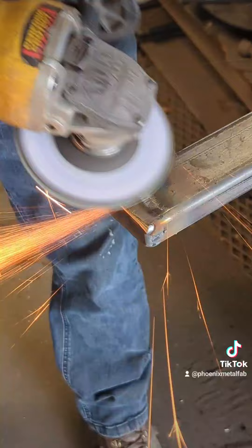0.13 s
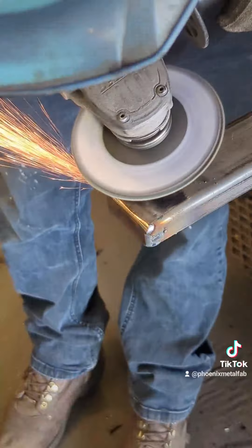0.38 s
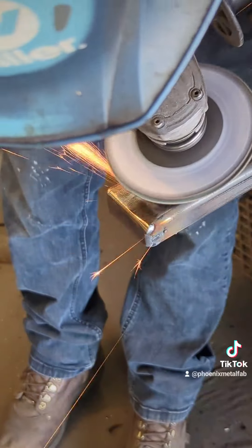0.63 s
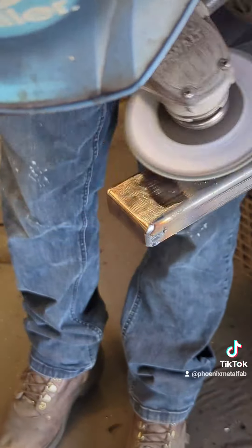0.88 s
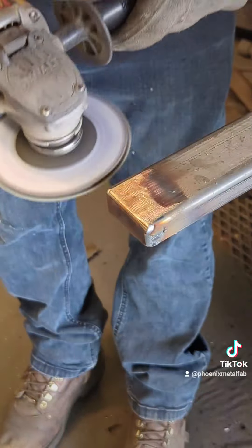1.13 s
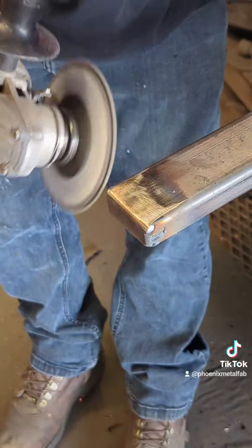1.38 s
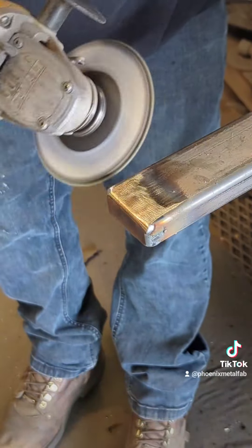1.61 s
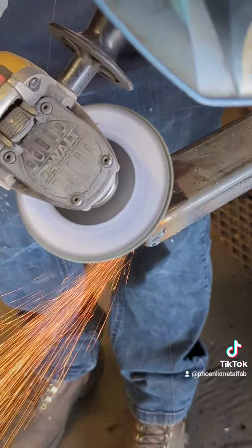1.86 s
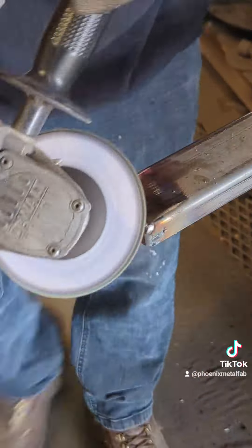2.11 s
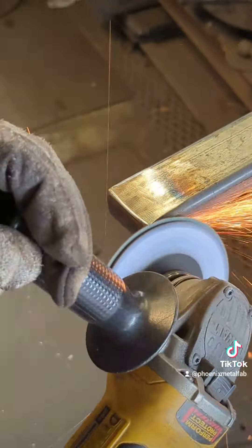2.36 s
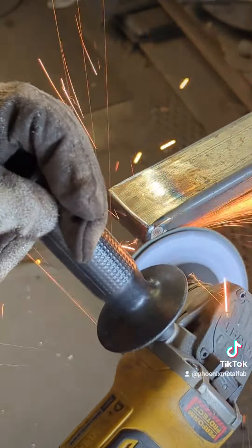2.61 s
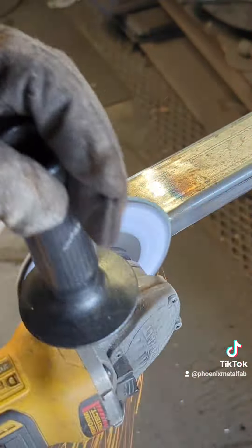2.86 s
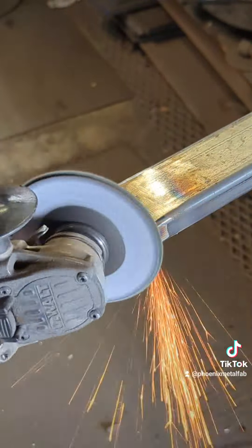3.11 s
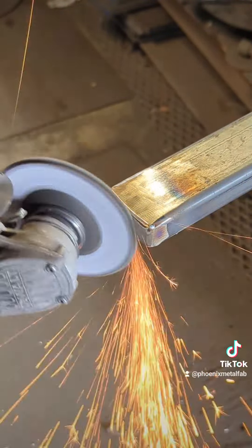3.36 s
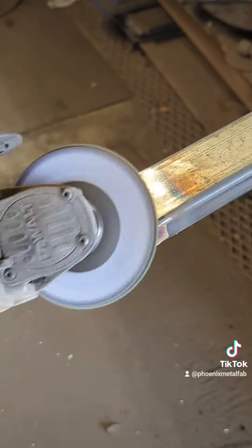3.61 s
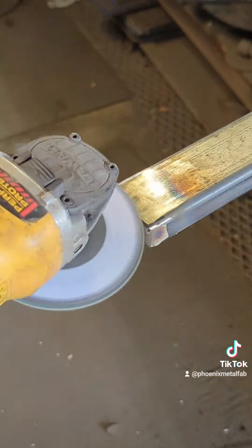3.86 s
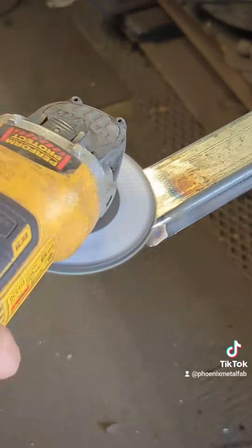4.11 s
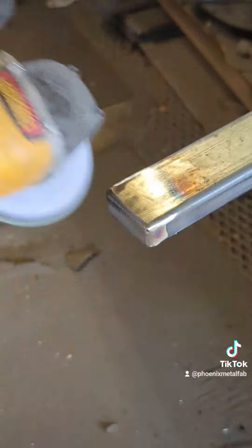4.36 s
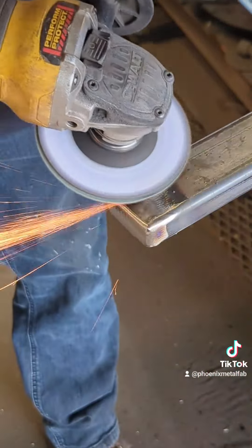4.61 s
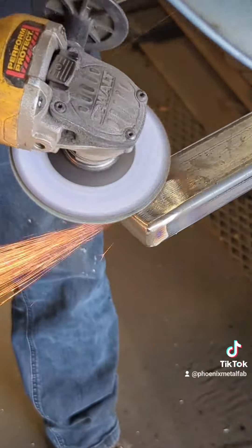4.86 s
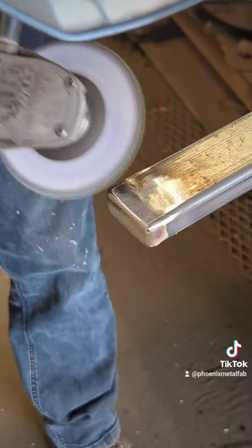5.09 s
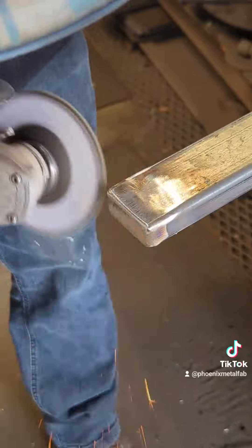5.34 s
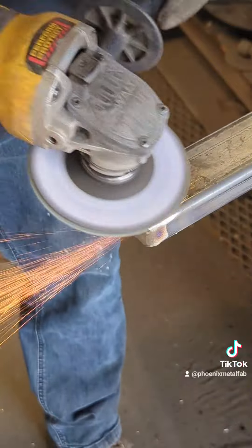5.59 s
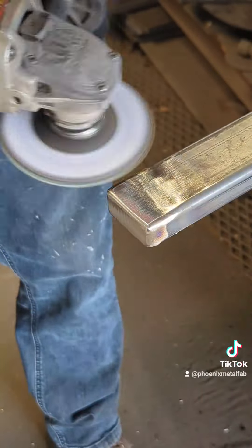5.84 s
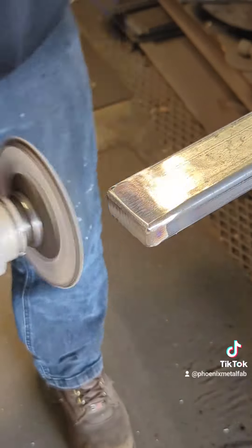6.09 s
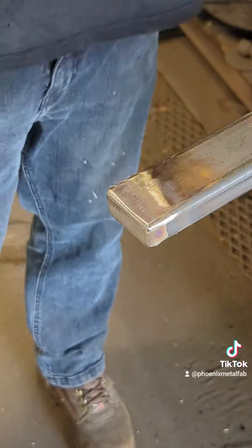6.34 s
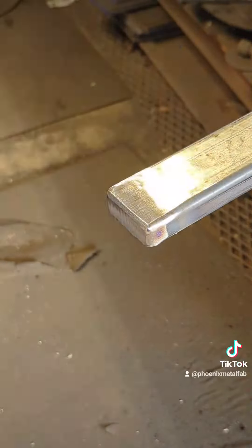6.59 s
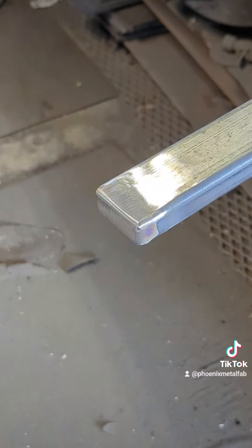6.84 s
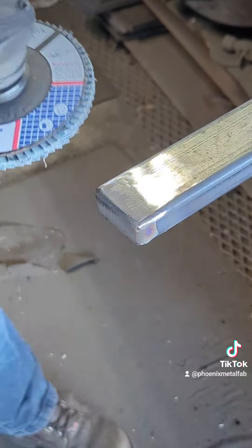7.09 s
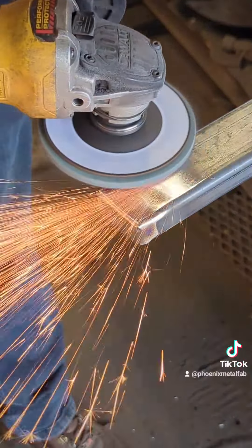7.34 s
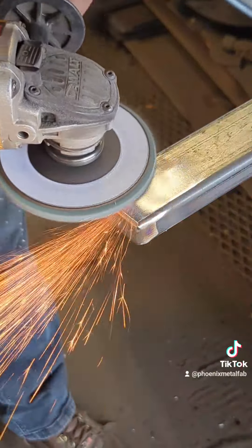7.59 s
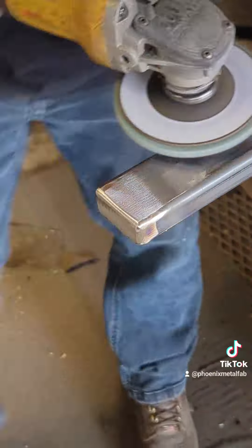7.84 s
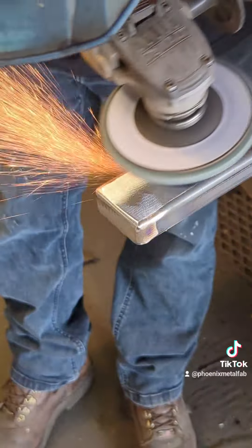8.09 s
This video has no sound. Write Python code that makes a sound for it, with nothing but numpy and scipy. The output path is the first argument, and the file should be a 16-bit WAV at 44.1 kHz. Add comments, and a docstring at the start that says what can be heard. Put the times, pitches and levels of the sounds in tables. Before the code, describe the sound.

Bright, flickering grinding of steel over a high motor whine, flaring with each stroke, pausing about a second in a rumbling workshop before resuming.

```python
"""An angle grinder works a weld on a steel tube: bright flickering hiss, motor whine and fuzzy disc orders, flaring
with each stroke over knocks, ringing taps and short rough tones. At 2.4 s the disc is pressed hard and its orders
swell. At 6 s it coasts down, leaving workshop rumble and air hiss, which drop out for an instant near 6.87 s; at
7.2 s it spins up and grinds on. Hiss, rumble and air are shaped random spectra, whine and orders are sines that
share a motor speed, jabs and bites dragging disc tones below it; knocks and taps are decaying modes."""
import sys
import numpy as np
from scipy import signal
from scipy.io import wavfile
from scipy.ndimage import uniform_filter1d

SR = 44100
rng = np.random.default_rng(int(sys.argv[2]) if len(sys.argv) > 2 else 0)


def attenuation_scalar(level_db):
    """Turn a level in dB into a linear amplitude multiplier (20 dB per decade)."""
    decades = np.asarray(level_db, float) / 20
    return 10 ** decades


def log_audio(samples):
    """Write samples as a 16-bit WAV file to the path given in sys.argv[1]."""
    # one column per channel
    frames = np.atleast_2d(samples).T
    # limit to full scale, then quantise
    limited = np.clip(frames, -1, 1)
    pcm = np.round(limited * 32767).astype(np.int16)
    wavfile.write(sys.argv[1], SR, pcm)


N = 362061

# Spells in which the disc grinds. Each row: start in seconds, end in seconds.
SPELLS = [(0, 6.16), (7.166, 9)]
# The disc is pressed hard: start in seconds, end in seconds.
HEAVY = (2.385, 2.75)
# The sound drops out: start in seconds, end in seconds.
DROPOUT = (6.872, 6.879)
SWITCH_OFF_S, SILENT_S = 6.025, 6.08
SWITCH_ON_S, SPIN_UP_S = 7.194, 0.018
FREE_HZ = 4402  # motor whine at full speed


def evened(x):
    """Scales to rms 1."""
    return x / np.sqrt(np.mean(x ** 2) + 1e-20)


def read(points, hz):
    """Reads a spectrum on a log-frequency axis."""
    f, value = np.transpose(points)
    return np.interp(np.log(hz + 1), np.log(f + 1), value)


def running(spans, t):
    """1 inside the spans, 0 outside, with short edges."""
    return sum(np.clip(np.minimum(t - a, b - t) / 0.00093 + 1, 0, 1) for a, b in spans)


def flicker(per_s):
    """Random wander of rms about 1 that changes per_s times a second."""
    steps = rng.standard_normal(int(N / SR * per_s) + 2)
    return np.interp(np.arange(N) / SR * per_s, np.arange(len(steps)), steps) * np.sqrt(1.5)


def noise(colour_db, patchy_db, size, count=7):
    """Two-port noise of rms 1: random short-time spectra coloured by colour_db(t, hz), with drifting patches."""
    # Likeness of the two ports. Each row: frequency in Hz, coherence.
    coherence = [(200, 0.9), (330, 0.99), (1000, 1), (2500, 0.91), (5000, 0.77), (9000, 0.67), (15000, 0.5)]
    # Phase between the ports. Each row: frequency in Hz, lead of the left port in radians.
    port_lead = [(3000, 0.081), (6000, 0.25), (10000, 1), (15000, 0.74)]
    hop = size // 4
    hz, t = np.fft.rfftfreq(size, 1 / SR), np.arange(N // hop + 5) * hop / SR
    a, b, c, d, patches = rng.standard_normal((5, len(t), len(hz)))
    patches = uniform_filter1d(patches, size=7, axis=0)
    patches = evened(uniform_filter1d(patches, size=count, axis=1))  # count bins wide
    same = np.clip(read(coherence, hz), -1, 1)
    left = a + 1j * b
    right = same * left + np.sqrt(1 - same ** 2) * (c + 1j * d)
    right = right * np.exp(-1j * read(port_lead, hz))
    z = np.array([left, right]) * attenuation_scalar(colour_db(t[:, None], hz) + patchy_db * patches)
    return evened(signal.istft(z.transpose(0, 2, 1), nperseg=size, noverlap=size - hop)[1][:, :N])


def light(db, count):
    """Light events scattered at random before switch-off, within 3 dB of the given level."""
    u = rng.random((count, 2))
    return [(a * SWITCH_OFF_S, db + 3 * (2 * b - 1)) for a, b in u]


def sided(events, lead):
    """Lets each event lead in the left or the right port by chance; lead in radians."""
    return [(s, db, lead * side) for (s, db), side in zip(events, rng.choice([-1, 1], len(events)))]


def low_floor():
    """Faint low noise that sinks while the tool rests."""
    def colour_db(t, hz):
        return read([(20, -3.0), (300, 1.0), (500, -21), (900, -90)], hz)
    t = np.arange(N) / SR
    level_db = -71.5 + 2.9 * (running(SPELLS, t) - 1)
    return attenuation_scalar(level_db) * noise(colour_db, patchy_db=0.8, size=2048)


def rumble():
    """Lumpy low noise of machines booming in the hall: broad colour plus two resonances."""
    # Base level before flicker and a common offset. Each row: time in seconds, level in dB.
    shop_levels = [(0, -46.5), (1.6, -45.5), (1.8, -51), (2.9, -49.5), (3.9, -53.5), (4.76, -48),
                   (5.5, -53), (6.3, -44), (7.1, -43.5), (7.65, -55), (8.21, -46)]
    # Broad colour. Each row: frequency in Hz, density in dB per Hz.
    rumble_colour = [(150, -70), (250, -37), (457, -5), (655, -3.5), (826, -10), (1130, -12.5),
                     (1250, -12.5), (1490, -12), (2460, -30), (4000, -63), (5200, -64), (8800, -120)]
    # Resonances. Each row: frequency in Hz, width in Hz, boost in dB.
    booms = [(477, 18, 3), (696.7, 18, 8)]

    def colour_db(t, hz):
        boost_db = sum(db / (1 + ((hz - f) / w) ** 2) for f, w, db in booms)
        return read(rumble_colour, hz) + boost_db
    t = np.arange(N) / SR
    level_db = np.interp(t, *np.transpose(shop_levels)) + 2.5 + 1.46 * flicker(70)
    return noise(colour_db, patchy_db=2.5, size=2048, count=2) * attenuation_scalar(level_db)


def air_hiss():
    """Smooth workshop air noise; after the dropout it comes back lower and rises to a new level."""
    # Colour of the air. Each row: frequency in Hz, density in dB per Hz.
    air_colour = [(1470, -21), (2500, -12.5), (3120, -13), (4090, -11.5), (4660, -12.5), (9100, -4.5),
                  (15700, -13.5)]
    before_db, after_db, dip_db, recover_s = -43.5, -39.5, -10, 0.3
    t = np.arange(N) / SR
    dip = np.clip(1 - (t - DROPOUT[1]) / recover_s, 0, 1)
    level_db = np.where(t < DROPOUT[1], before_db, after_db + dip_db * dip)
    return noise(lambda t, hz: read(air_colour, hz), patchy_db=0.9, size=512) * attenuation_scalar(level_db)


def struck(events, modes, rise_s, detune):
    """Every blow sums the same decaying modes, detuned at random, with a phase lead in one port."""
    t, out = np.arange(SR // 8) / SR, np.zeros((2, N + SR))
    for (s, db, lead), tune in zip(events, rng.standard_normal(len(events))):
        ahead = lead / 2 * np.array([[1], [-1]])
        blow = 0
        for hz, mode_db, t60 in modes:
            decay = attenuation_scalar(mode_db - 60 * t / t60)
            blow = blow + decay * np.sin(2 * np.pi * hz * (1 + detune * tune) * t + ahead)
        blow *= 1 - np.exp(-t / rise_s)
        out[:, round(s * SR):][:, :len(t)] += attenuation_scalar(db) * blow / abs(blow).max()
    return out[:, :N]


def knocks():
    """Dull knocks: heavily damped modes, with light ones scattered at random."""
    # Knocks. Each row: start in seconds, peak in dB, lead of the left port in radians.
    knock_events = [(2.3264, -28, -2.5), (2.3921, -29, -1.5), (2.4234, -32, 2), (2.474, -37, 2),
                    (2.5077, -27.5, 0.8), (2.5177, -29, 1.5), (2.546, -31, 1.5), (2.8248, -29.5, -0.6),
                    (3.0174, -30, -1.1), (3.3412, -28, 1.5), (3.5292, -30.5, 1), (3.6591, -30.5, 0.5),
                    (3.7227, -35, -1.5), (3.865, -29, 0.5), (4.1121, -31.5, 1), (4.6789, -28.5, 0.5),
                    (4.715, -28, -0.8), (5.0971, -26.5, -1), (5.1211, -32, -1.5), (5.1767, -28, 1),
                    (5.2235, -27, 1.4), (5.2895, -29, 1), (5.3837, -32, -1.5), (5.4266, -29, 0.2),
                    (5.7252, -28, 1.5), (5.7497, -26.5, -1.5), (7.17, -24, -0.5), (7.3032, -13.5, -1.2),
                    (7.3205, -32, 1), (7.3391, -21, -1.8), (7.5242, -13.5, 1), (7.757, -27.5, -2),
                    (7.8985, -20, 1.5), (8.0059, -27.5, 0.5), (8.0398, -30, 0.5), (8.058, -24, -0.3),
                    (8.0797, -30, 1.5), (8.1631, -23.5, 0.7), (8.1784, -20, -1.5)]
    # Modes. Each row: frequency in Hz, level in dB, t60 in seconds.
    thud_modes = [(704, -1, 0.012), (1237, 6, 0.0064), (2110, -7, 0.0088), (3275, 3, 0.0046)]
    events = knock_events + sided(light(-39, count=16), lead=0.72)
    return struck(events, thud_modes, rise_s=0.0034, detune=0.11)


def taps():
    """The disc taps the tube and its wall rings in lightly damped modes."""
    # Taps. Each row: start in seconds, peak in dB.
    tap_events = [(1.007, -26), (1.0552, -26), (1.1058, -25), (1.1527, -24.5), (1.204, -27), (1.383, -32),
                  (1.439, -36), (1.531, -32), (3.5973, -29.5), (3.8492, -34), (4.1838, -32.5), (5.364, -29),
                  (5.4935, -23.5), (5.917, -29)]
    # Modes of the tube wall. Each row: frequency in Hz, level in dB, t60 in seconds.
    wall_modes = [(1357, -1, 0.051), (1285, -8.5, 0.061), (2270, -12, 0.038), (690, 5, 0.0094),
                  (1640, 1.5, 0.01)]
    return struck(sided(tap_events, lead=0.33), wall_modes, rise_s=0.001, detune=0.0058)


def short_tones():
    """Short gliding tones, rough in level and phase; those near 2450 Hz are the second disc order standing out."""
    # Each row: start in seconds, length in seconds, start frequency in Hz, end frequency in Hz, base level in dB.
    tone_events = [(0.462, 0.22, 1660, 1760, -46.5), (0.47, 0.257, 1055, 1114, -46),
                   (1.52, 0.19, 1156, 1090, -49.5), (2.299, 0.057, 2440, 2460, -45),
                   (2.8, 0.34, 917, 937, -51.5), (2.899, 0.1, 2430, 2470, -39),
                   (4.878, 0.19, 1064, 1110, -48), (6.12, 0.31, 1064, 1050, -52)]
    out = np.zeros((2, N))
    for s, length, hz, end_hz, db in tone_events:
        glide_hz = np.linspace(hz, end_hz, round(length * SR))
        n = len(glide_hz)
        rough = attenuation_scalar(db + 4.0 * flicker(110)[:n]) * signal.windows.tukey(n, 0.9)
        phase = 2 * np.pi * np.cumsum(glide_hz) / SR + flicker(47.5)[:n]
        out[:, round(s * SR):][:, :n] += rough * np.sin(phase)
    return out


def grip(t):
    """Hiss, whine, first-order and high-order base dB: each grip holds its levels and slides into the next."""
    # Each new grip turns the tool to or from the microphone. Each row: start in seconds, hiss level in dB,
    # whine level in dB, first disc order level in dB, reference level of the higher orders in dB.
    grips = [(0, -29, -40, -44.5, -35.5), (.075, -31.5, -44, -47, -46), (.125, -30, -43, -49.5, -39),
             (.19, -30.5, -42, -55, -54), (.31, -28.5, -39.5, -49.5, -38.5), (.9, -28.5, -43, -59, -64),
             (1.4, -28.5, -43.5, -55.5, -47), (1.782, -31, -44, -56, -44), (2.26, -30.5, -57, -62, -42.5),
             (2.55, -27.5, -55, -71, -62), (2.76, -30, -52, -56.5, -47), (3.5, -29.5, -48.5, -53, -47),
             (4.47, -29.5, -38.5, -64, -45.5), (4.6, -29.5, -39, -47, -38), (5.04, -30, -47, -51, -44.5),
             (5.32, -30.5, -46.5, -56.5, -46), (5.6, -30, -41.5, -55, -43), (6.04, -33.5, -48, -76, -49),
             (7.181, -28.5, -43, -53.5, -44.5), (7.3, -28.5, -42.5, -46, -47),
             (7.42, -29.5, -42.5, -50.5, -44.5), (7.55, -31, -44, -55.5, -47.5),
             (7.78, -28.5, -40, -48, -54), (7.92, -32, -46, -50, -44)]
    regrip_s = 0.05
    s, *values = np.transpose(grips)
    slides = [np.clip((t - at) / regrip_s + 0.5, 0, 1) for at in s[1:]]
    return [v[0] + sum(change * slide for change, slide in zip(np.diff(v), slides)) for v in values]


def scuff_db(t):
    """The disc scuffs the edge: one short jump of hiss and whine level for each scuff."""
    # Each row: time in seconds, jump in dB.
    scuffs = [(3.9, 8), (3.968, 8.5), (4.137, 7), (4.151, 7), (4.219, 9), (4.238, 5), (4.248, 10),
              (4.401, 5.5), (4.434, 3.5), (4.439, 8), (5.313, 7), (5.388, 7)]
    scuff_s = 0.0016
    out, half = np.zeros(len(t)), SR // 100
    bump = np.exp(-(np.arange(-half, half) / SR / scuff_s) ** 2)
    for s, db in scuffs:
        out[round(s * SR) - half:][:2 * half] += db * bump
    return out


def bites():
    """Pressure of each stroke, swelling and letting go within milliseconds, and the speed it costs the disc."""
    # Strokes that bite. Each row: time in seconds, drive in dB.
    stroke_events = [(0.41, -20), (0.4474, -18), (0.7944, -14), (0.997, -13.5), (1.032, -19), (1.048, -12),
                     (1.097, -10.5), (1.131, -18), (1.145, -14.5), (1.192, -12), (1.253, -16),
                     (1.7568, -14), (2.178, -12.5), (2.955, -20), (3.16, -12), (3.2257, -12), (3.279, -13),
                     (3.342, -14), (3.4, -12.5), (3.455, -20), (3.605, -16), (3.644, -17), (4.7202, -12),
                     (5.907, -15), (6.0204, -17), (7.174, -23), (7.195, -21)]
    flare, sag, u = np.zeros(N), np.zeros(N), np.arange(SR // 25) / SR
    swell = np.exp(-((u - 0.014) / np.where(u < 0.014, 0.009, 0.0065)) ** 2)
    for s, db in stroke_events + light(-17, count=14):
        at = round((s - 0.008) * SR)
        flare[at:][:len(u)] += attenuation_scalar(db) * swell
        sag[at:][:len(u)] = 0.081 * np.clip((u - 0.008) / 0.022, 0, 1)  # fraction of speed
    return flare, sag


def strokes(flare):
    """Noise part of each bite, in the bands where disc and tube sing."""
    # Singing bands. Each row: frequency in Hz, width in Hz, level in dB.
    bite_bands = [(12640, 400, 17.5), (9400, 86, -7), (13800, 700, -3), (7000, 2800, -11),
                  (4640, 1100, -26)]

    def colour_db(t, hz):
        return 20 * np.log10(sum(attenuation_scalar(db) / (1 + ((hz - f) / w) ** 2) for f, w, db in bite_bands))
    return noise(colour_db, patchy_db=3.0, size=256) * flare * attenuation_scalar(-18)


def grind():
    """Grit on steel: dense hiss whose lower part follows how the tool is turned, flickering with the grain."""
    # Hiss colours, before and after the pause. Each row: frequency in Hz, density in dB per Hz.
    hiss_colours = [
        [(530, -33), (900, -15.5), (1240, -12.5), (1520, -19), (2640, -17), (4260, -10), (5290, -11.5),
         (11900, -0.5), (15700, -7.5)],
        [(530, -46), (900, -11.5), (1240, -11), (1980, -17), (2490, -21), (2870, -13), (4260, -11),
         (8950, -1.5), (15700, -6)],
    ]
    # The disc rattles lightly along the edge: start in seconds, end in seconds.
    loose = (2.7, 4.45)

    def colour_db(t, hz):
        held = np.where(t > SPELLS[1][0], read(hiss_colours[1], hz), read(hiss_colours[0], hz))
        lower = np.clip(np.log(7000 / (hz + 1)) / 1.39, 0, 1)  # fades in below 7 kHz
        lower_db = 0.33 * (grip(t)[0] + 25.2) - 2.2  # swings more than the top
        lower_db = lower_db - 4.9 * running([HEAVY], t)
        lower_db = lower_db - 5 * running([(SILENT_S, SPELLS[0][1])], t)
        return held + lower * lower_db
    t = np.arange(N) / SR
    level_db = grip(t)[0] + 0.5 * flicker(30) + 0.46 * flicker(120) + 1.37 * flicker(240) + 1.87
    level_db += scuff_db(t) + 0.88 * running([loose], t) * flicker(170)
    level_db -= 3.3 * running([HEAVY], t)  # under load the power goes into the orders
    return noise(colour_db, patchy_db=2.0, size=512, count=5) * attenuation_scalar(level_db) * running(SPELLS, t)


def speed(t):
    """Whine frequency in Hz: load sags it, it coasts down when switched off and spins up again."""
    load_s, unload_s, load_sag_hz = 0.03, 0.025, 500
    deeper_hz, deepest_s, coast_hz_per_s = 180, 2.58, 28200
    pressed = np.minimum((t - HEAVY[0]) / load_s + 1, (HEAVY[1] - t) / unload_s + 1)
    pressed = np.clip(pressed, 0, 1)
    deeper = np.interp(t, [HEAVY[0], deepest_s, HEAVY[1]], [0, deeper_hz, deeper_hz / 3])
    hz = FREE_HZ - (load_sag_hz + deeper) * pressed
    coasting = np.maximum(hz - coast_hz_per_s * np.maximum(t - SWITCH_OFF_S, 0), 0)
    return np.where(t < SWITCH_ON_S, coasting, hz * np.tanh((t - SWITCH_ON_S) / SPIN_UP_S))


def jab(t):
    """One short jab at 0.064 s: rises to 1, holds and lets go."""
    return np.clip(1.8 * (1 - abs(t - 0.064) / 0.034), 0, 1)


def presses_db(t):
    """The disc leans in and its high orders swell."""
    # Each row: time in seconds, swell in dB.
    presses, press_s = [(0.135, 12.6), (0.165, 9.7)], 0.0078
    return sum(db * np.exp(-((t - s) / press_s) ** 2) for s, db in presses)


def motor_lines(t, gear, whine_db, first_db, high_db):
    """Lists each tone: ratio to the whine, dB, dB under heavy load, fuzz, disc multiple, half port lead."""
    # Orders of the disc shaft. Each row: multiple, dB against the high-order reference before the pause,
    # the same after it, dB under heavy load.
    disc_orders = [(1.5, -45, -12.5, -74), (2, -16.5, -8, -46), (2.5, -26, -5.5, -61), (3, -10, -6, -52),
                   (4, -27, -25, -66), (5, -10.5, -2, -49.5), (6, -25, -7, -44.5), (7, -8.5, 1, -43),
                   (8, -4, -12, -44), (9, -4.5, -12, -37), (10, 5.5, -1, -36.5), (11, -11, 3, -34.5),
                   (12, -6, -1, -34), (13, -21, -20, -37), (14, -30, -30, -35)]
    # Whine shifted by whole disc orders. Each row: multiple added, dB against the high-order reference,
    # dB under heavy load.
    sidebands = [(1, -30, -50), (2, -12, -50), (3, -16, -50), (4, -11, -56), (6, -8, -50), (7, -30, -37),
                 (11, -30, -35)]
    lines = [(1, whine_db, -41, 0.3, 0, 0.5), (gear, first_db, -54, 0.5, 1, 0.05)]
    lines.append((1270 / 4402, first_db - 4.5, -70, 1.3, 1, 0.05))  # beats with the first order
    for k, before_db, after_db, loaded_db in disc_orders:
        reference_db = np.minimum(high_db, -41 if k < 4 else 0)
        db = reference_db + np.where(t > SWITCH_ON_S, after_db, before_db)
        lines.append((k * gear, db, loaded_db, 0.62 if k < 4 else 0.8, k, 0.15))
    for k, db, loaded_db in sidebands:
        lines.append((1 + k * gear, high_db + db, loaded_db, 0.7, k, 0.15))
    return lines


def motor(flare, sag):
    """Whine, disc orders and sidebands on a shared speed; a jab or bite drags disc tones below it."""
    gear = 1238 / 4402  # first disc order against the whine
    jab_duck_db, jab_sag_hz, chirp_db = -8.5, 360, -17.5
    t = np.arange(N) / SR
    hz = speed(t)
    whine_db, first_db, high_db = grip(t)[1:]
    starting = (t > SWITCH_ON_S) * (1 - hz / FREE_HZ)  # the whine leads the start, the disc orders come in late
    whine_db = whine_db + 9 * starting + scuff_db(t) + jab_duck_db * jab(t)
    first_db = first_db + jab_duck_db * jab(t)
    high_db = high_db - 60 * starting + 1.3 * flicker(14) + presses_db(t)

    turns = 2 * np.pi * np.cumsum(hz) / SR
    braked = 2 * np.pi * np.cumsum(hz * (1 - sag)) / SR
    dragged = 2 * np.pi * np.cumsum(jab_sag_hz * jab(t)) / SR
    runout = 0.19 * flicker(45) + 0.23 * flicker(140)  # the disc runs a little ahead and behind, radians
    loaded = running([HEAVY], t)
    chatter = np.sin(2 * np.pi * np.cumsum(44 + 4 * flicker(12)) / SR)  # the pressed disc skips on the weld
    swell_db = 2.0 * chatter + 5 * (t - HEAVY[1]) / (HEAVY[1] - HEAVY[0])
    turns += 1.2 * loaded * chatter

    out = np.zeros((2, N))
    for ratio, db, loaded_db, fuzz, k, lead in motor_lines(t, gear, whine_db, first_db, high_db):
        ports = np.array([[lead], [-lead]])
        wander = fuzz * flicker(30 * ratio + 15) + k * gear * runout
        wander = wander + 1.1 * loaded * flicker(70 * ratio)
        rough_db = (3.0 - 1.5 * loaded) * fuzz * flicker(25 * ratio + 15)
        size = attenuation_scalar(db + loaded * (loaded_db + swell_db - db) + rough_db) * np.sqrt(2)
        if k > 6:  # a bite drives the high orders as a falling chirp
            chirp = np.cos(ratio * braked + wander / 2 + 2 * ports)
            out += attenuation_scalar(db - high_db + chirp_db) * flare * chirp
        out += size * np.cos(ratio * (turns - (k > 0) * dragged) + wander + ports)
    return out * running([(0, SILENT_S), (SWITCH_ON_S + 0.5 * SPIN_UP_S, 9)], t)


def scene():
    """Sums all sources at the two microphone ports."""
    flare, sag = bites()
    background = rumble() + air_hiss()
    contacts = knocks() + taps() + short_tones()
    return background + contacts + strokes(flare) + grind() + motor(flare, sag)


def roll_off(x):
    """The treble ends steeply here."""
    return signal.sosfilt(signal.butter(12, 16890, fs=SR, output="sos"), x)


def record(dry):
    """Steep band limits, the low floor, and a dropout of a few milliseconds."""
    t = np.arange(N) / SR
    band = signal.firwin(1023, [300, 15800], pass_zero=False, window=("kaiser", 8), fs=SR)
    mix = signal.oaconvolve(dry, band[None], "same") + low_floor()
    gap = np.clip(np.maximum(DROPOUT[0] - t, t - DROPOUT[1]) / 0.0011, 0.03, 1)
    return roll_off(mix * gap)


dry = scene()
out = record(dry)
log_audio(out)
```